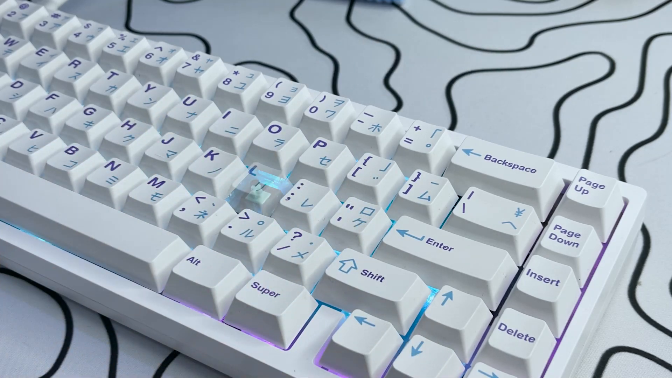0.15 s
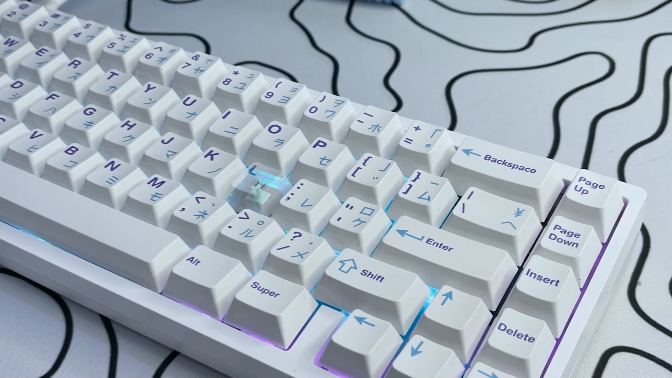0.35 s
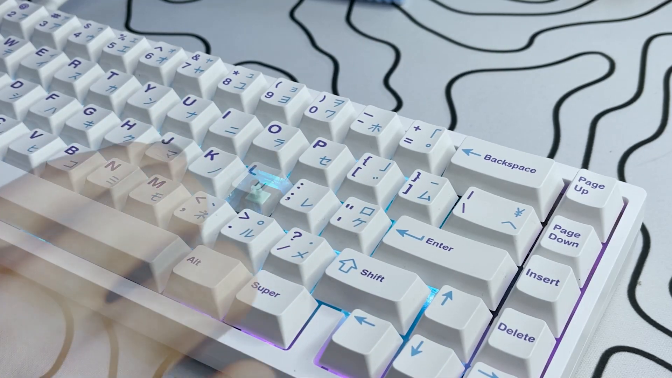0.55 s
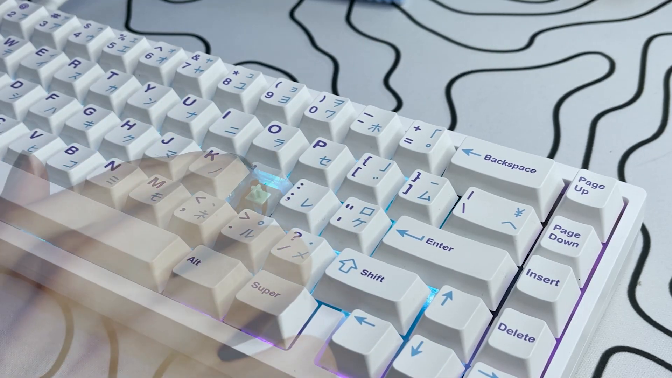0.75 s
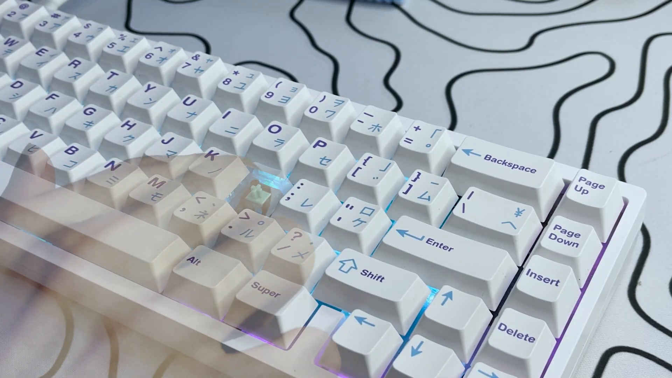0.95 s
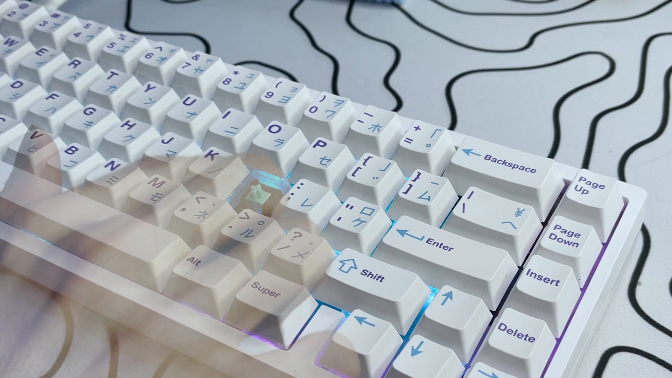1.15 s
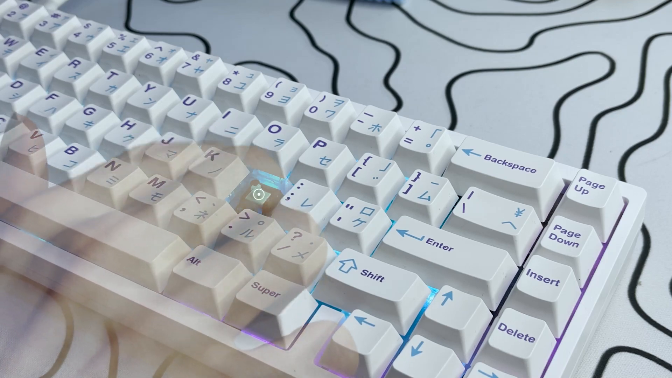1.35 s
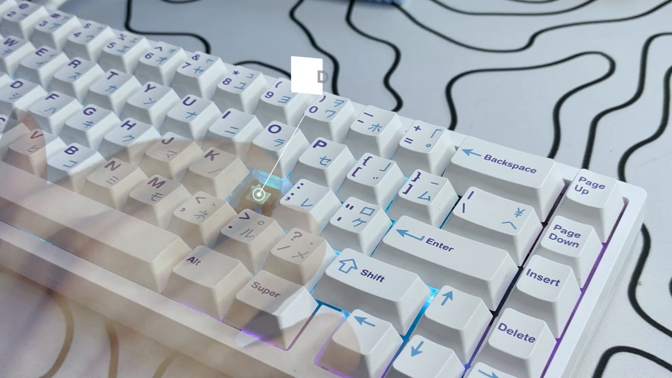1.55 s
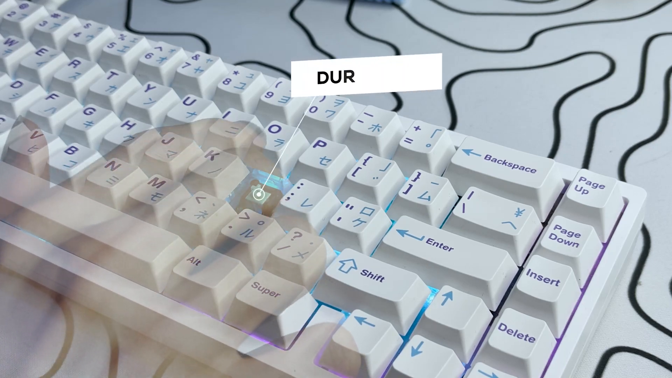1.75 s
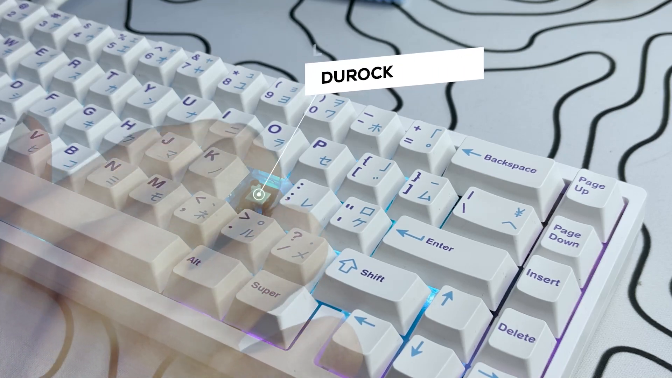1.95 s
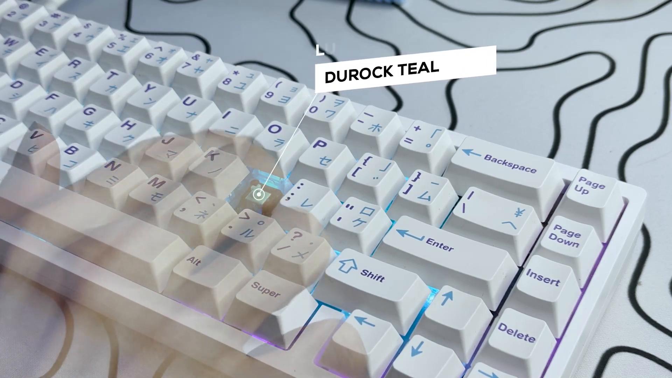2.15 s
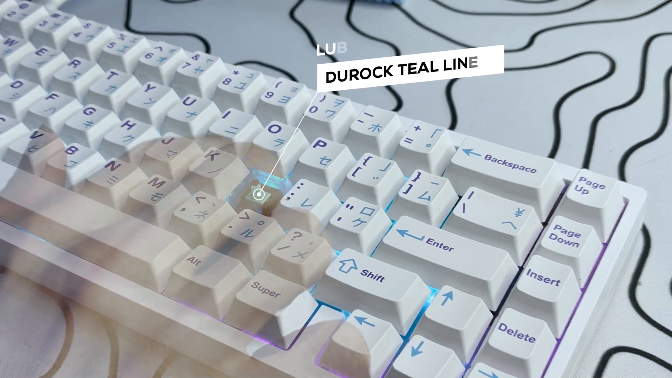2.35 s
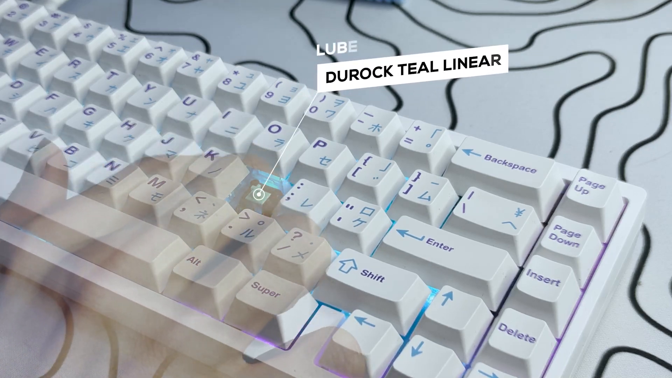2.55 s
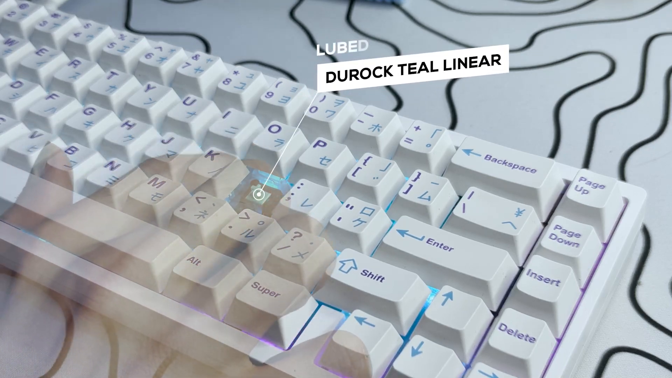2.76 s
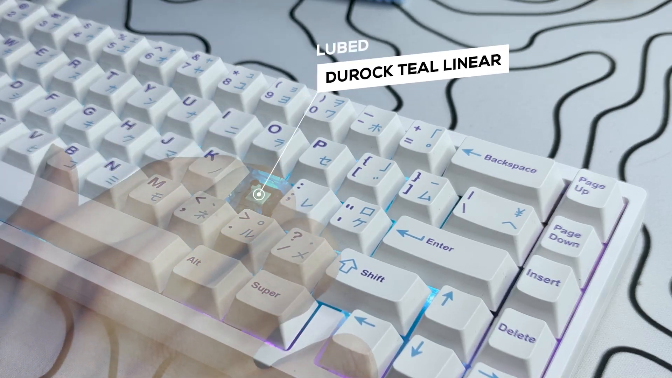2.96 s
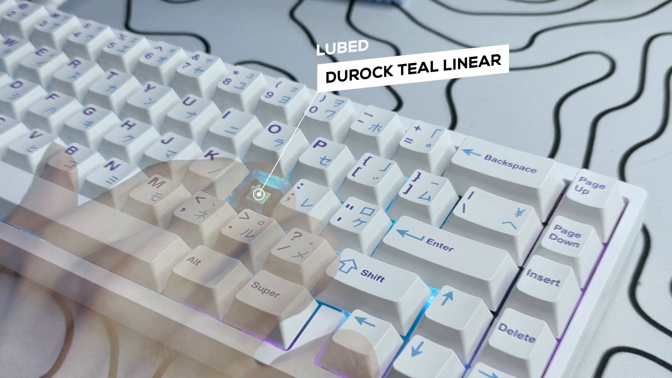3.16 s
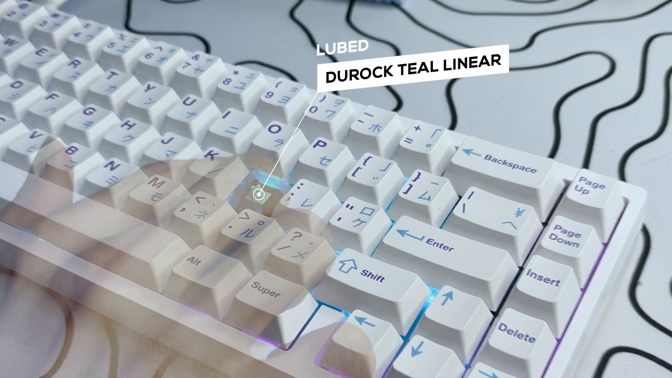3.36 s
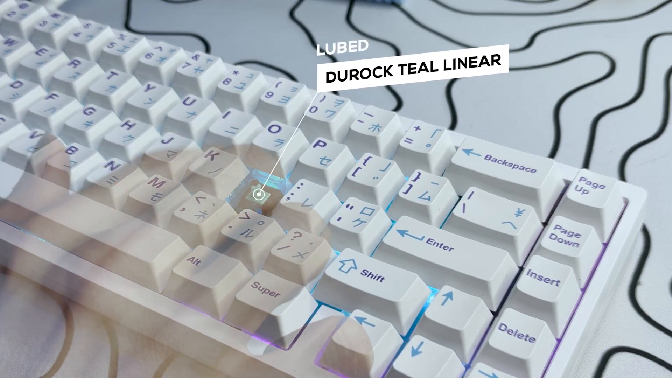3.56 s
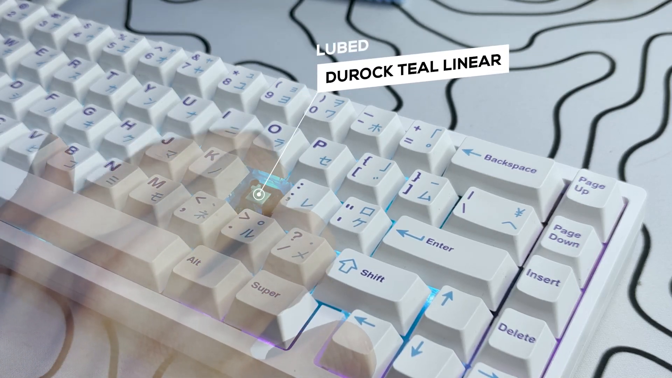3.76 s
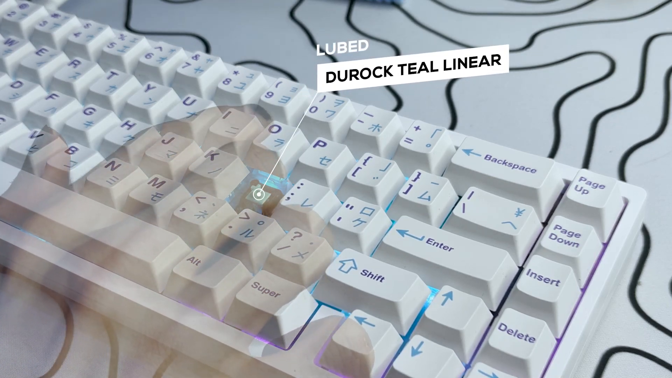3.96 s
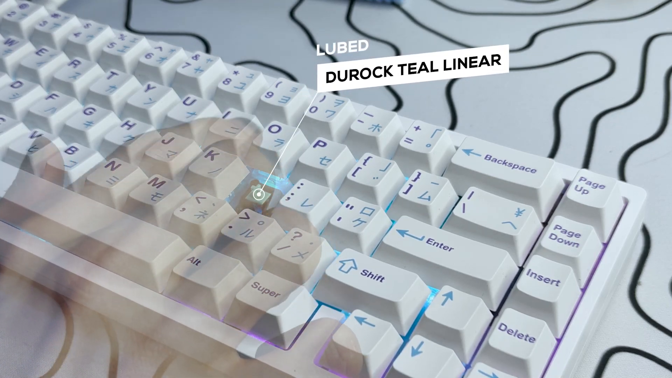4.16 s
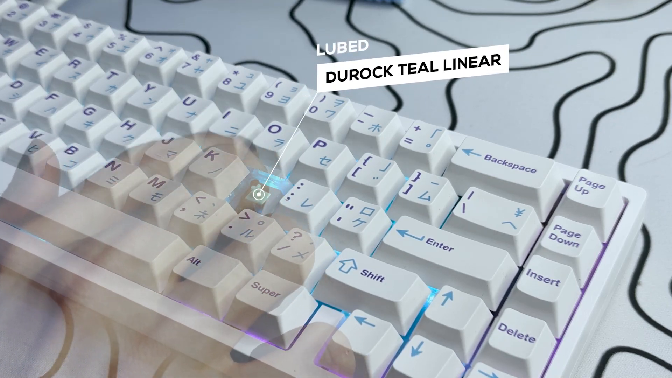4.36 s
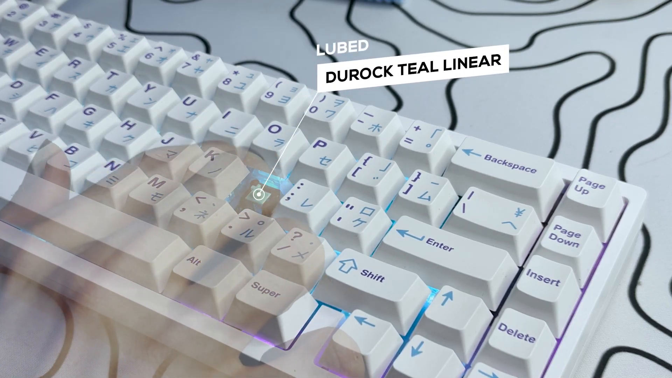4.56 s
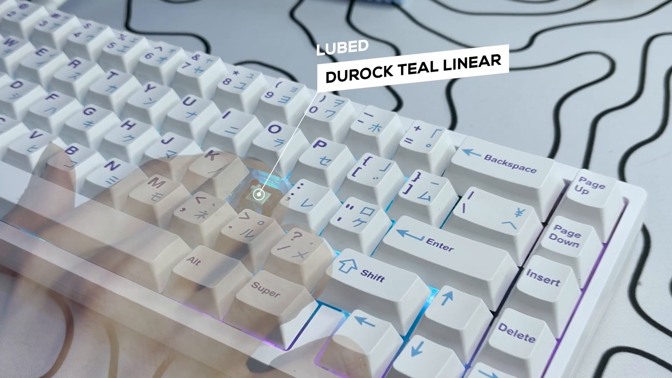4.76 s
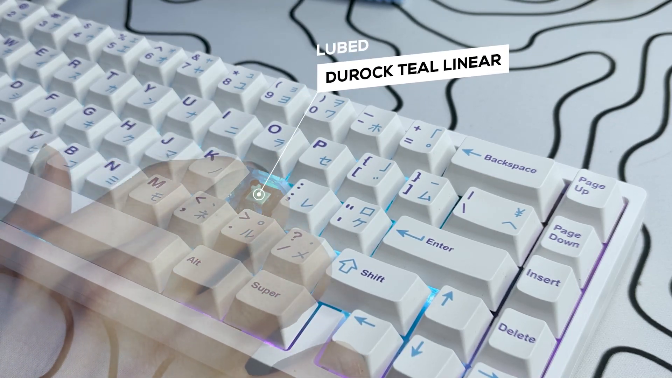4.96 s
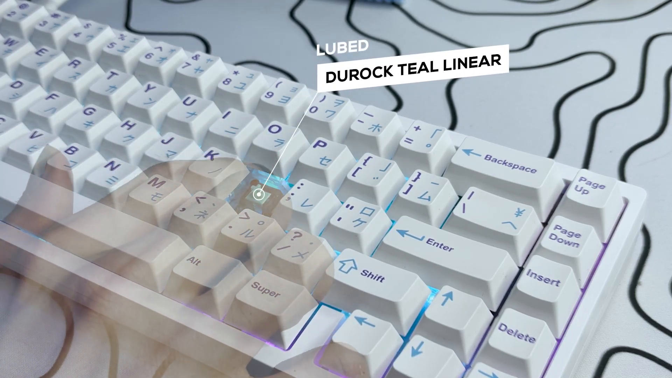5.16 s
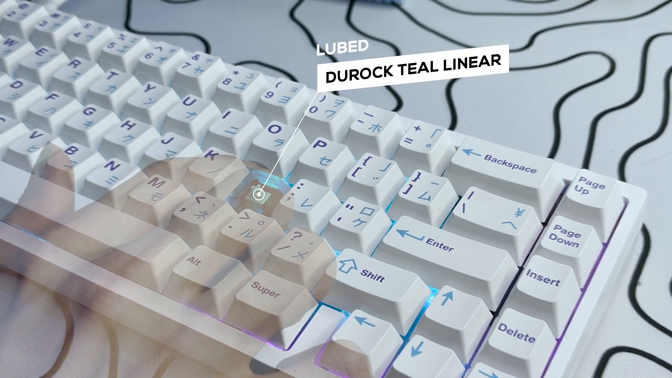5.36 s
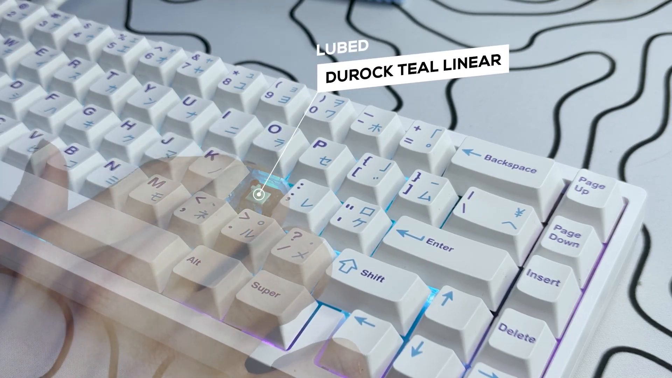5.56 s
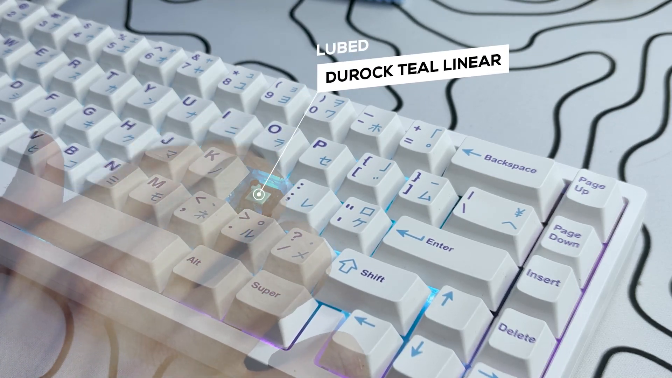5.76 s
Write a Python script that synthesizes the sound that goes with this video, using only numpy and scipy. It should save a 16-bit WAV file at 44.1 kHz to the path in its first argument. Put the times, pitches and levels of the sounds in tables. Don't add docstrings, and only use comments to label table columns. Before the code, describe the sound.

Quiet indoor room with faint fan hum and very low rumble. A small low bump comes early, then from just over a second a finger taps one mechanical key steadily, about five strokes a second. Each stroke gives a faint fingertip touch, a sharp bottom-out clack and a lighter return click. Close microphone on the desk, with short room reflections and deep thumps underneath.

```python
import sys
import numpy as np
from scipy import signal
from scipy.fft import rfft, irfft
from scipy.io import wavfile

SR = 44100
rng = np.random.default_rng(int(sys.argv[2]) if len(sys.argv) > 2 else 0)


def how_loud(loudness_db):
    steps = np.asarray(loudness_db, float) / 20
    return 10 ** steps


def put_to_file(sound):
    columns = np.atleast_2d(sound).T
    safe = np.clip(columns, -1, 1)
    whole_steps = np.round(safe * 32767)
    wavfile.write(sys.argv[1], SR, whole_steps.astype(np.int16))


N = 256220

# (frequency [Hz], density [dB per Hz])
AIR_COLOUR = [(12, -66), (20, -5), (33, -1.5), (90, -16), (126, -9.5), (166, -24), (232, -19.5),
              (343, -21.5), (383, -27.5), (417, -29.5), (770, -30), (885, -32.5), (1340, -32.5),
              (5410, -46.5), (15600, -49.5)]
# (frequency [Hz], width [Hz], level [dB])
FAN_LINES = [(63.6, 7.5, -64), (115.8, 4.7, -72.5), (159, 12, -77), (289.8, 8.2, -77.5), (779, 5.2, -80.5),
             (1790, 16, -85.5), (7970, 180, -90.5)]
# (time [s], level [dB])
SWAY = [(0.0, -39), (0.12, -35), (0.34, -40), (0.5, -48), (1.2, -48), (1.4, -42), (1.6, -73), (2.2, -51),
        (3.6, -53), (3.75, -41), (4.6, -40), (5.2, -39), (5.81, -37.5)]
# (time [s], jump [full scale], fade [s])
WAVE_JUMP = (.3326, .025, .03)
# (time [s], clack peak [dB], case rel [dB], plate rel [dB])
TOUCHES = [(1.2339, -49, -8, -3), (1.4457, -54, 6, -2), (1.6519, -43, 0, -16), (1.8776, -59, 13.5, 4),
           (2.1085, -56, 9, 2), (2.3259, -60, 13.5, 8), (2.5564, -40.5, -0.5, 1.5), (2.7818, -40, -2, -8),
           (3.008, -53, 1, -4), (3.2343, -53.5, 3, -1), (3.4471, -55, 0, 3), (3.6602, -53, 3, 1),
           (3.8734, -56, -2, -1), (4.1062, -56, -1, -1), (4.332, -42, -1, -1.5), (4.5327, -51, -7, -4),
           (4.7611, -59, -5, -1), (5.003, -59, 2, 5), (5.2097, -58, -2, -4), (5.4293, -57, 0, -9),
           (5.6398, -58, 1, 4)]
# (time [s], clack peak [dB], case rel [dB], plate rel [dB], desk push [dB])
BOTTOMS = [(1.247, -30, -6, 1, 2), (1.4638, -29, -14, -3, -6), (1.6696, -38, -1.5, 2, 0),
           (1.8903, -33.5, -5, 3.5, 2.5), (2.1236, -37.5, -1, 1.5, 0.5), (2.3384, -35.5, -1.5, 2.5, 0.5),
           (2.5661, -27, -15, -2, 4), (2.7921, -24.5, -16, -2.5, 3.5), (3.0207, -31, -6, 1.5, 1.5),
           (3.246, -30.5, -5, 1, 3.5), (3.4603, -32, -7.5, 4.5, 0.5), (3.671, -31, -6, 6, 4),
           (3.89, -31.5, -11, -1, -1), (4.1198, -33, -15, 2.5, -1), (4.3475, -34, -9.5, 0.5, -3),
           (4.545, -27.5, -14.5, -1.5, 2.5), (4.7774, -34.5, -5.5, 0.5, -2), (5.015, -26, -13.5, 0, 1),
           (5.2323, -43.5, 2.5, 4.5, -7), (5.4471, -36, -3.5, 1, -6.5), (5.657, -32.5, -14.5, 1.5, -10)]
# (time [s], clack peak [dB], case rel [dB], plate rel [dB])
RETURNS = [(1.3383, -42, 0.5, -3), (1.5459, -40, 2.5, -3.5), (1.7495, -37.5, 1.5, 2),
           (1.9795, -39, 2.5, 3.5), (2.2048, -42, 2.5, 1.5), (2.419, -40.5, 4, 1), (2.6503, -39, 2.5, -1.5),
           (2.8706, -35.5, -0.5, 4), (3.1009, -40.5, 4, 2.5), (3.329, -39.5, 2, 8.5),
           (3.5337, -41.5, 4.5, 4.5), (3.7532, -39, 1.5, 3.5), (3.9647, -36.5, 1, 6.5),
           (4.1995, -40, 1, -0.5), (4.4241, -41.5, 6.5, 3.5), (4.6357, -45.5, 5, 1),
           (4.8624, -45.5, 7, 1.5), (5.0981, -37.5, 2, 11.5), (5.3008, -46, 9.5, 1.5),
           (5.5344, -47.5, 9.5, 4.5), (5.7387, -44.5, 6.5, 1)]
# (usual clack [dB], stem tick rel [dB], tick loss [dB per dB harder], chatter [ms])
TOUCH_RULE = (-53.5, 4.1, .6, 2.6)
BOTTOM_RULE = (-33, -7.5, 0.29, 0.58)
RETURN_RULE = (-41, 2, 0.19, 1.3)
# (frequency [Hz], level [dB], t60 [s])
CASE_DOWN_MODES = [(787, -28.5, 0.047), (1065, -3.5, 0.02), (1277, 5, 0.0072), (1483, 0.5, 0.012)]
CASE_UP_MODES = [(785, -22, .05), (1100, -8, .022), (1238, 0, .023), (1440, -10, .02)]
PLATE_MODES = [(1811, -1, 0.021), (2019, -0.5, 0.015), (2260, -5.5, 0.011), (2194, -7.5, 0.03),
               (2560, -15, 0.036), (2665, -16.5, 0.038), (2977, -11.5, 0.027), (3204, -13, 0.018),
               (3550, -15.5, 0.022)]
CAP_DOWN_MODES = [(4117, -11.5, 0.016), (4153, -6.5, 0.016), (4570, -2, 0.0098), (5046, 0.5, 0.0086),
                  (5695, -1.5, 0.0073), (5823, -6, 0.0069), (6170, -11, 0.0051)]
CAP_UP_MODES = [(4335, 1.5, 0.0086), (4940, -3.5, 0.016), (5370, 3.5, 0.0045), (6130, -4.5, 0.011),
                (6650, -1, 0.0071)]
STEM_MODES = [(7490, -7.5, 0.0019), (8615, -3.5, 0.004), (9410, -11, 0.006), (10190, -3.5, 0.0054),
              (10780, -13.5, 0.012), (10730, -39.5, 0.064), (12740, -9, 0.002), (13280, -15.5, 0.0066),
              (13740, -14.5, 0.0075), (15200, -12, 0.0027)]
RISE_MS = [2.7, .2, .04, .02]
CHATTER_SHARE = [.08, .1, .2, .4]
CRACK_DB = [-5, -7.5, -9, -1]
CRACK_SIGN = [1, 1, -1, 1]
# (frequency [Hz], level [dB], t60 [s])
ROOM_BANDS = [(400, -23.5, 0.24), (1230, -12.5, 0.3), (1900, -7, 0.2), (2420, -7, 0.19), (3400, -9, 0.19),
              (4700, -6.5, 0.21), (6000, -14.5, 0.17), (16000, -15, .1)]
# (time [s], level over taps [dB])
ECHOES = [
    (.0034, -4),
    (.0075, 8.5),
    (0.0107, 9.5),
]
# (frequency [Hz], level [dB], t60 [s])
DESK_MODES = [(27.67, 5, 0.63), (32.16, 5, 0.58)]
# (frequency [Hz], level [dB], t60 [s])
PANEL_MODES = [(69.6, -9, 0.14), (157.4, -12, 0.27), (323, -48, 0.044), (520, -20, .04)]


def evened(x):
    return x / np.sqrt(np.mean(x ** 2) + 1e-20)


def peaked(x):
    return x / abs(x).max()


def add(mix, time_s, sound):
    part = mix[round(time_s * SR):][:len(sound)]
    part += sound[:len(part)]


def ring(modes, t_s, scatter_db=0, rise_ms=0.0034, damping=1, detune=0):
    hz, db, t60_s = np.transpose(modes)[..., None]
    sign = (-1.) ** np.arange(len(modes))[:, None]
    chance = rng.standard_normal(hz.shape)
    db = db + scatter_db * chance
    hz = hz * (1 + detune * chance[::-1])
    decay = how_loud(db - 60 * damping * t_s / t60_s)
    waves = sign * decay * np.sin(2 * np.pi * hz * t_s)
    rise = (1 - np.exp(-t_s * 1000 / rise_ms)) ** 2
    return waves.sum(0) * rise


def air():
    hz = np.fft.rfftfreq(N, 1 / SR)
    knot_hz, knot_db = np.transpose(AIR_COLOUR)
    colour_db = np.interp(np.log(hz + 1), np.log(knot_hz + 1), knot_db)
    colour = how_loud(-55) * evened(how_loud(colour_db))
    for line_hz, width_hz, line_db in FAN_LINES:
        line = 1 / (1 + (2 * (hz - line_hz) / width_hz) ** 2)
        colour = np.hypot(colour, how_loud(line_db) * evened(line))
    noise = rfft(rng.standard_normal(N))
    return irfft(noise * colour * (hz < 15760), N)


def stroke_count(t_s):
    beats_s = np.array([row[0] for row in BOTTOMS])
    beats_s = np.r_[beats_s[0] - 6 * .2, beats_s, beats_s[-1] + .22]
    return np.interp(t_s, beats_s, np.r_[-6, np.arange(len(beats_s) - 1)])


def stand_sway():
    t_s = np.arange(N) / SR
    level = how_loud(np.interp(t_s, *np.transpose(SWAY)))
    return np.sqrt(2) * level * np.cos(2 * np.pi * (stroke_count(t_s) - .06))


def wave_jump():
    time_s, jump, fade_s = WAVE_JUMP
    t_s = np.arange(N) / SR - time_s
    return jump / 2 * np.sign(t_s) * np.exp(-abs(t_s) / fade_s)


def strike(row, rule, case, cap, trim_db, case_late_ms):
    clack_db, case_db, plate_db = row[1:4]
    usual_db, tick_db, tick_loss, chatter_ms = rule
    tick_db = tick_db - tick_loss * (clack_db - usual_db)
    t_s = np.arange(4000) / SR
    ms = t_s[:400] * 1000
    knocks = rng.standard_normal(len(ms)) * (rng.random(len(ms)) < .3)
    chatter = knocks / (1 + (ms / chatter_ms) ** 4)
    rings, cracks = np.zeros((2, len(t_s)))
    parts = ((case, case_db), (PLATE_MODES, plate_db), (cap, 0), (STEM_MODES, tick_db))
    for k, (modes, part_db) in enumerate(parts):
        contacts = CHATTER_SHARE[k] * chatter
        contacts[0] = 1
        gain = how_loud(clack_db + part_db + trim_db[k])
        late_samples = round(case_late_ms * SR / 1000) if k == 0 else 0
        tone = ring(modes, t_s, scatter_db=1.86, rise_ms=RISE_MS[k], detune=.012)
        tone = signal.fftconvolve(tone, contacts)
        add(rings, late_samples / SR, gain * peaked(tone))
        crack = ring(modes, t_s, scatter_db=2.5, damping=7.4)
        crack_gain = CRACK_SIGN[k] * gain * how_loud(CRACK_DB[k])
        add(cracks, late_samples / SR / 4, crack_gain * peaked(crack))
    return rings + cracks, cracks


def contact_series(rows, rule, case, cap, trim_db, case_late_ms):
    key, crack = np.zeros((2, N))
    for row in rows:
        key_part, crack_part = strike(row, rule, case, cap, trim_db, case_late_ms)
        add(key, row[0] + .0004, key_part)
        add(crack, row[0] + .0004, crack_part)
    return key + room(key / 8 + 3.19 * crack)


def keys():
    touches = contact_series(TOUCHES, TOUCH_RULE, CASE_UP_MODES, CAP_UP_MODES,
                             trim_db=(-1.0, 0.0, -2.0, -3.0), case_late_ms=3.0)
    bottoms = contact_series(BOTTOMS, BOTTOM_RULE, CASE_DOWN_MODES, CAP_DOWN_MODES,
                             trim_db=(6.7, 1.4, 1.07, 1.7), case_late_ms=1.6)
    returns = contact_series(RETURNS, RETURN_RULE, CASE_UP_MODES, CAP_UP_MODES,
                             trim_db=(1.6, 1.83, 3.6, 1.3), case_late_ms=.9)
    return touches + bottoms + returns


def room(x):
    taps = np.zeros(SR // 2)
    at = np.arange(200, len(taps) - 20, 20)
    taps[at + rng.integers(0, 20, len(at))] = rng.choice([-1., 1.], len(at))
    for time_s, echo_db in ECHOES:
        taps[round(time_s * SR)] = how_loud(echo_db)
    hz, t_s, spectrum = signal.stft(taps, SR, nperseg=128)
    band_hz, band_db, band_t60_s = np.transpose(ROOM_BANDS)
    level_db = np.interp(hz, band_hz, band_db)[:, None]
    t60_s = np.interp(hz, band_hz, band_t60_s)[:, None]
    fade = how_loud(level_db - 60 * t_s / t60_s)
    tail = how_loud(-13.5) * signal.istft(spectrum * fade, SR, nperseg=128)[1]
    return signal.fftconvolve(x, tail)[:N]


def stand_rocking():
    start_db, growth_db_per_s, rise_s = -41.5, 1.42, .2
    t_s = np.arange(N) / SR
    typing_s = np.maximum(t_s - BOTTOMS[0][0], 0)
    level = how_loud(start_db + growth_db_per_s * typing_s) * np.minimum(typing_s / rise_s, 1)
    return np.sqrt(2) * level * np.cos(2 * np.pi * (3 * stroke_count(t_s) - .06))


def desk_thumps():
    t_s = np.arange(SR // 2) / SR
    push = ring(DESK_MODES[:1], t_s, rise_ms=2.0)
    push = push + ring(DESK_MODES[1:], t_s, rise_ms=2.6)
    push = push + ring(PANEL_MODES, t_s, rise_ms=1.2)
    desk = np.zeros(N)
    for down, up in zip(BOTTOMS, RETURNS):
        blow = how_loud(down[-1]) * push
        add(desk, down[0] + .003, blow)
        add(desk, up[0] + 0.0044, -0.54 * blow)
    return how_loud(-46.5) * evened(desk)


def scene():
    return (air() + stand_sway() + keys() + stand_rocking() + desk_thumps())[None]


def top_cut(x):
    return signal.sosfilt(signal.butter(12, 16640, fs=SR, output="sos"), x)


def record(dry):
    low_pass = signal.firwin(101, 16200, window=("kaiser", 7), fs=SR)
    mix = signal.oaconvolve(dry + wave_jump(), low_pass[None], "same")
    return top_cut(mix)


dry = scene()
out = record(dry)
put_to_file(out)
```